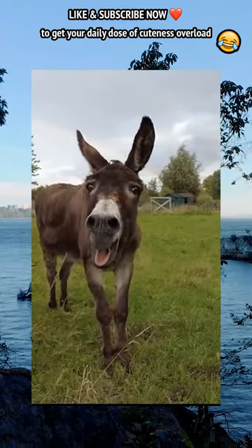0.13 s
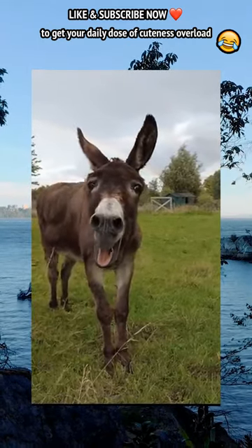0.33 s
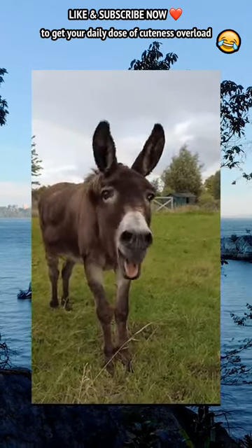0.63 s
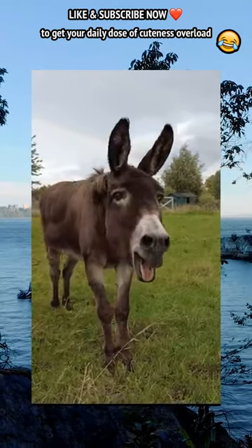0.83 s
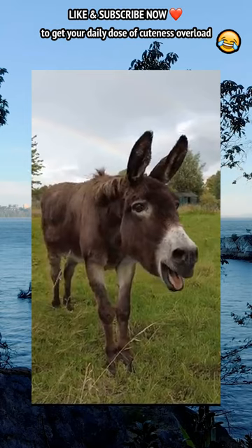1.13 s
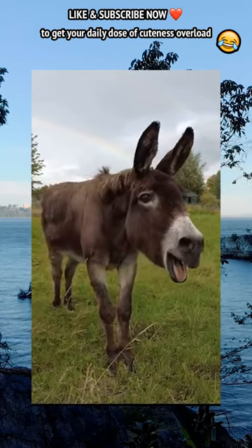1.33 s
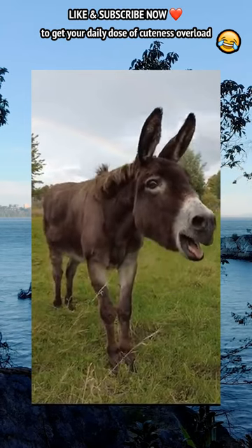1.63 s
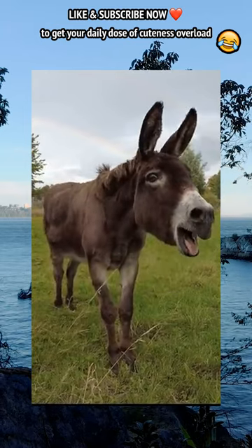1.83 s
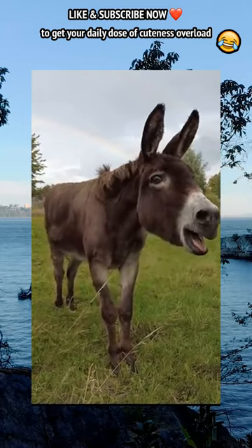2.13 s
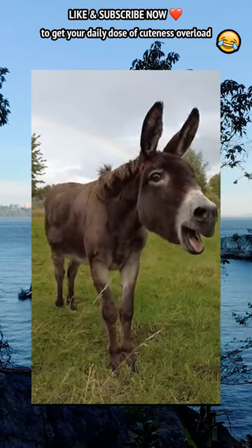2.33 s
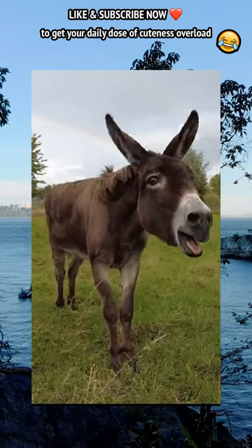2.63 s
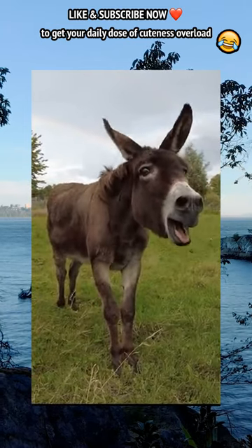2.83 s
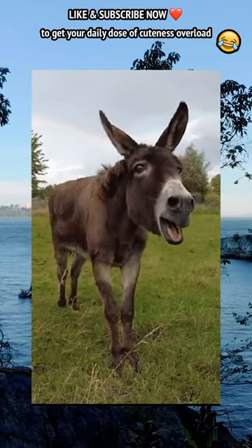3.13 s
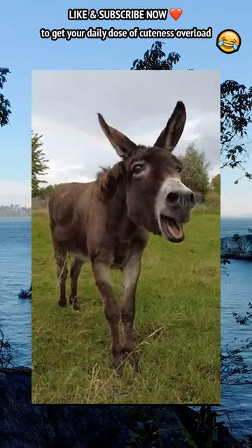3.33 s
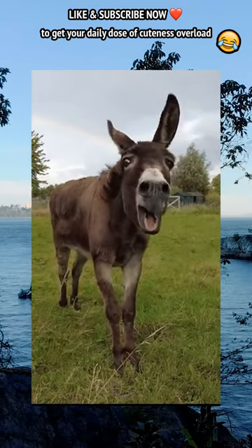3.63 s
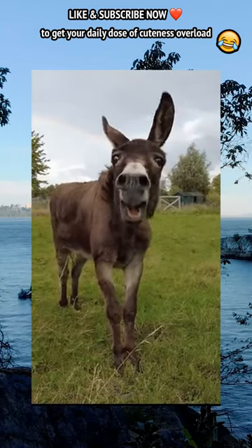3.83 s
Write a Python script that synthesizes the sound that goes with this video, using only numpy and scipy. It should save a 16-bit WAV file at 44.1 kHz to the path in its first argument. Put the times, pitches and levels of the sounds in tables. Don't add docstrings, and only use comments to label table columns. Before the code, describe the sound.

Donkey bray: rasping creaks, whistled in-breaths and puffs repeat about twice a second, ending in loud honks

```python
import sys
import numpy as np
from scipy import signal
from scipy.fft import rfft, irfft
from scipy.io import wavfile
from scipy.ndimage import uniform_filter1d, map_coordinates

SR = 44100
rng = np.random.default_rng(int(sys.argv[2]) if len(sys.argv) > 2 else 0)


def inscribe(sig):
    pcm = np.round(np.clip(np.atleast_2d(sig).T, -1, 1) * 32767)
    wavfile.write(sys.argv[1], SR, pcm.astype(np.int16))


def decibels_to_gain(level_db):
    exponent = np.asarray(level_db, float) / 20
    return 10 ** exponent


N = 176400
T = np.arange(N) / SR


def ring(x, modes, twice=False):
    out = 0
    for k, (hz, width_hz, db) in enumerate(modes):
        b, a = signal.iirpeak(hz, hz / width_hz, fs=SR)
        y = signal.lfilter(b, a, x)
        if twice:
            y = signal.lfilter(b, a, y)
        out = out + (-1) ** k * decibels_to_gain(db) * y
    return out


def highpass(x, order, hz):
    return signal.sosfilt(signal.butter(order, hz, "high", fs=SR, output="sos"), x)


def unit(x):
    return x / np.sqrt(np.mean(x ** 2))


def walk(rate_hz):
    k = max(int(SR / rate_hz), 1)
    return unit(uniform_filter1d(uniform_filter1d(rng.standard_normal(N), k), k))


def track(table, col):
    rows = np.array(table, float)
    return uniform_filter1d(np.interp(T, rows[:, 0], rows[:, col]), size=64)


def swell(start, end, edge):
    u = (T - start) / (end - start)
    return np.sin(np.pi / 2 * np.clip(np.minimum(u, 1 - u) / edge, 0, 1)) ** 2


def add_clicks(buf, s, db):
    at = np.clip(np.asarray(s) * SR, 0, N - 2)
    i = at.astype(int)
    np.add.at(buf, i, decibels_to_gain(db) * (1 - at + i))
    np.add.at(buf, i + 1, decibels_to_gain(db) * (at - i))


# t/s, level/dB
CLOSING_SLAPS = [(0.138, -32), (0.144, -26), (0.1475, -27.5), (0.1537, -28.5), (0.1606, -22), (0.1706, -17),
                 (0.1771, -17), (0.1857, -14), (0.1948, -14.5), (0.2087, -8.5), (0.2181, -11.5),
                 (0.2455, -14.5), (0.6365, -18), (0.6462, -28), (0.6554, -17), (0.6655, -20.5),
                 (0.678, -13), (0.6932, -11.5), (0.7203, -16.5), (1.1428, -33), (1.1491, -30.5),
                 (1.1547, -28.5), (1.162, -28.5), (1.1716, -22), (1.1836, -23), (1.1951, -14.5),
                 (1.2155, -18.5), (1.6874, -33.5), (1.6911, -32), (1.699, -26.5), (1.707, -25),
                 (1.7162, -22.5), (1.7313, -15), (1.757, -16.5), (2.2109, -31), (2.2176, -29),
                 (2.2229, -35), (2.232, -28), (2.2443, -20.5), (2.2659, -16), (2.7839, -30), (2.798, -34.5),
                 (2.8068, -25), (2.8228, -21.5), (3.3629, -25), (3.3746, -28.5), (3.3861, -24.5),
                 (3.9709, -28.5), (3.974, -34), (3.988, -30.5)]


def closing_creaks(throat, mouth, teeth):
    s, db = np.array(CLOSING_SLAPS).T
    bright_gap_s = 0.013
    dull = np.sqrt(np.clip(1 - np.diff(s, prepend=0) / bright_gap_s, 0, 1))
    db = db + 3.5
    add_clicks(teeth, s, db - 5 * dull)
    add_clicks(mouth, s, db + 3.5 * (2 * dull - 1))
    add_clicks(throat, s, db + 2 + 12 * (dull - 1))


# start t/s, length/s, second gap/s, settled gap/s, click level/dB
OPENING_CREAKS = [
    (0.3132, 0.11, 0.0065, 0.004, -6.5),
    (0.832, .088, 0.0072, 0.0042, -6.5),
    (1.368, 0.071, 0.0079, .0049, -10),
    (1.9063, 0.058, 0.0076, 0.0044, -8.5),
    (2.46, 0.048, 0.008, .0048, -15.5),
    (3.0246, 0.039, .008, 0.0054, -16),
    (3.5904, 0.044, 0.0073, 0.0039, -17),
]
# first gap/s, throat ring level/dB, time until it dulls/s
OPENING_GROANS = [
    (.0089, -14.5, 0.054),
    (.0095, -13.5, 0.023),
    (0.0128, -14.5, 0.015),
    (.0082, -14.5, 0.003),
    (.0086, -15.5, .002),
    (0.0102, -15, 0.0012),
    (.0128, -19, 0.0016),
]


def opening_creaks(throat, narrowed, mouth, teeth):
    settle, jitter, swell_s = 0.72, 0.03, 0.014
    dull_db_per_s, dullest_db = 502, -21.5
    for (start, length, second, settled, db), (first, groan_db, dulls) in zip(OPENING_CREAKS, OPENING_GROANS):
        k = np.arange(32)
        gap_chance, level_chance = rng.standard_normal((2, 32))
        gaps = (settled + (second - settled) * settle ** k) * (1 + jitter * gap_chance * (k / 8) ** 2.7)
        s = np.cumsum(np.append([0, first], gaps))[:len(k)]
        on = s < length
        u = np.clip(s / length, 0.01, 0.99)
        dull = np.clip(-dull_db_per_s * (s - dulls), dullest_db, 0)
        groan = groan_db - 9 * np.exp(-s / swell_s) + 1.17 * gap_chance - 6 * u ** 6
        at = start + s[on]
        add_clicks(teeth, at, (db + dull + 0.6 * level_chance)[on])
        add_clicks(mouth, at, (db - 2.5 + 0.7 * dull - 8 * u ** 3)[on])
        add_clicks(throat, at, (groan + 10 * np.log10(1 - u ** 2))[on])
        add_clicks(narrowed, at, (groan + 20 * np.log10(u))[on])


def spray(clicks):
    tail = signal.lfilter([1], [1, -np.exp(-1 / (0.003 * SR))], clicks)
    return clicks + tail * rng.standard_normal(N) * decibels_to_gain(-22)


# f/Hz, width/Hz, level/dB
THROAT = [(389, 26.8, 5.5), (906, 97, 5.5)]
# f/Hz, width/Hz, level/dB
NARROWED_THROAT = [(363.6, 24, 3.5), (821, 31, 7)]
# f/Hz, width/Hz, level/dB
MOUTH = [(1373, 52, 4.5), (1850, 420, 1.5), (2510, 100, 0)]
# f/Hz, width/Hz, level/dB
TEETH = [(3080, 140, -1), (4225, 143, 4), (4664, 1100, -7.5), (5800, 160, -1), (6240, 400, -10.5),
         (7790, 1100, -14), (8900, 530, -15), (12800, 3500, -27)]


def creaks():
    throat, narrowed, mouth, teeth = np.zeros((4, N))
    closing_creaks(throat, mouth, teeth)
    opening_creaks(throat, narrowed, mouth, teeth)
    mouth, teeth = signal.lfilter(*signal.butter(2, 7500, fs=SR), [mouth, teeth])
    groan = decibels_to_gain(28.5) * ring(throat, THROAT) + decibels_to_gain(34.5) * ring(narrowed, NARROWED_THROAT)
    crack = decibels_to_gain(-5) * ring(teeth, [(4900, 5100, 0.03)], True) + decibels_to_gain(9.5) * ring(mouth, [(1410, 1600, 0.03)])
    return groan + crack + decibels_to_gain(20) * ring(spray(mouth), MOUTH) - decibels_to_gain(19.5) * ring(spray(teeth), TEETH)


# start t/s, end t/s, level/dB, f/Hz, roughness (0-1)
HEE_NOTES = [(0.248, 0.311, -26, 5770, 0.53), (0.28, 0.312, -31.5, 6190, 0.6),
             (0.737, 0.797, -22, 5800, 0.9), (0.768, 0.802, -21.5, 6080, 0.6),
             (1.243, 1.357, -29.5, 5900, 0.9), (1.263, 1.326, -16.5, 6220, 0.2),
             (1.305, 1.335, -17, 5530, 0.11), (1.782, 1.856, -18.5, 5910, 0.6),
             (1.825, 1.872, -12, 5530, 0.2), (2.31, 2.377, -14.5, 5786, 0.31), (2.329, 2.365, -25, 6170, 0),
             (2.345, 2.434, -10, 5496, 0.05), (2.873, 2.999, -10.5, 5478, .06),
             (3.447, 3.575, -9, 5452, 0.19), (2.346, 2.366, -24, 3030, 0.42),
             (0.256, .312, -40.5, 4130, .8), (0.731, 0.813, -35.5, 4220, .9),
             (1.268, 1.33, -32.5, 9430, .7), (0.778, .81, -41.5, 12800, .9), (0.747, 0.757, -34, 8900, .9),
             (2.385, 2.407, -38, 8100, .6)]
# f/Hz, width/Hz, level/dB
NOSE = [(2570, 220, 2.5), (3024, 224, 7.5), (4500, 1130, -2.5), (5190, 198.5, 11.5), (5440, 400, 3.5),
        (6045, 190, 3.5), (7880, 800, -2), (9560, 370, -4.5), (10770, 790, -7.5), (13300, 780, -14.5),
        (14640, 1300, -14), (1530, 2560, -9)]


def whistles():
    sag_hz_per_s, air_lead_s = 1100, 0.023
    tone, draw = 0, 0
    for start, end, db, hz, rough in HEE_NOTES:
        sagging_hz = hz - sag_hz_per_s * np.clip(T - start, 0, 0.2)
        pitch = sagging_hz * (1 + 0.036 * rough * walk(580))
        level = decibels_to_gain(db + 5.26 * rough * walk(190)) * swell(start, end, 0.32)
        tone = tone + level * np.sin(2 * np.pi * np.cumsum(pitch) / SR)
        air_level = decibels_to_gain(-28.5 + 0.42 * (db + 14.5))
        draw = np.maximum(draw, swell(start - air_lead_s, end + air_lead_s, 0.5) * air_level)
    noise = rng.standard_normal(N)
    air = 0
    for k, mode in enumerate(NOSE):
        air = air + (-1) ** k * decibels_to_gain(4.25 * walk(60)) * ring(noise, [mode], True)
    octave = highpass(2 * tone ** 2, 4, 7000)
    return np.sqrt(2) * tone + decibels_to_gain(-2.5) * octave + draw * unit(air)


# peak t/s, level/dB, rise/s and fall/s through 20 dB, overtone level/dB
HAWS = [
    (2.665, -28, 0.069, 0.063, -26.5),
    (3.208, -16, .048, 0.077, -3),
    (3.787, -14, .068, 0.089, 5.5),
]
# start t/s, end t/s, level/dB, f/Hz
HONKS = [
    (2.608, 2.664, -13, 806),
    (3.148, 3.223, -11, 800),
    (3.708, 3.772, -8, 775),
]


def effort():
    veiled_db, closes_s = -19.5, 0.059
    haw_level, honk_level, overtones, honk_hz = 0, 0, 0, 0
    for (peak, db, rise, fall, over_db), (start, end, honk_db, hz) in zip(HAWS, HONKS):
        u = (T - peak) / np.where(T < peak, rise, fall)
        s = np.maximum(T - start, 0)
        near = abs(u) < 2
        haw_level = haw_level + decibels_to_gain(db - 20 * abs(u) ** np.where(T < peak, 2.0, 2.6))
        honk_level = honk_level + decibels_to_gain(honk_db) * swell(start, end, 0.31)
        freed_db = np.where(T < end, veiled_db, -6 * ((T - end) / closes_s) ** 3)
        overtones = overtones + near * decibels_to_gain(over_db + freed_db)
        scoop = 0.15 * np.exp(-s / 0.009)
        climb = 0.11 * np.minimum(s / (end - start), 1) ** 3
        honk_hz = honk_hz + near * hz * (1 + scoop + climb)
    return haw_level, honk_level, overtones, honk_hz


# multiple of the pitch, level/dB
HAW_HARMONICS = [(1, 0), (2, -16.5), (3, -11), (4, -34.5), (5, -23), (6, -19.5), (7, -21), (8, -31)]


def voice():
    haw_level, honk_level, overtones, honk_hz = effort()
    rest_hz, pull_hz = 363.5, 42.28
    haw_hz = rest_hz - pull_hz * haw_level ** 2 / (haw_level ** 2 + decibels_to_gain(-24) ** 2)
    haw_phase = 2 * np.pi * np.cumsum(haw_hz * (1 + 0.005 * walk(120))) / SR
    honk_phase = 2 * np.pi * np.cumsum(honk_hz * (1 + 0.014 * walk(160))) / SR
    haw, honk = 0, 0
    for k, (_, db) in enumerate(HAW_HARMONICS):
        haw = haw + decibels_to_gain(db) * (overtones if k else 1) * np.cos((k + 1) * haw_phase - 0.29 * k)
    for k, db in enumerate((-3.5, -18, -28.5)):
        honk = honk + decibels_to_gain(db) * np.sin((k + 1) * honk_phase)
    sum_tone = decibels_to_gain(9) * np.sin(haw_phase + honk_phase)
    side_tones = decibels_to_gain(-5) * (np.sin(honk_phase - haw_phase) + np.sin(honk_phase + 2 * haw_phase))
    both = haw_level * honk_level * (sum_tone + side_tones)
    hoarse = unit(ring(rng.standard_normal(N), PUFF_MODES + THROAT))
    rasp = decibels_to_gain(-25) * (haw_level + honk_level) * (1 + np.sin(haw_phase)) * hoarse
    return np.sqrt(2) * (haw_level * haw + honk_level * honk + both) + rasp


# start t/s, length/s, level/dB, chest hum level/dB
PUFFS = [
    (-.05, 0.13, -41.5, -25),
    (0.475, 0.097, -42, -8),
    (0.966, 0.1, -40, -19),
    (1.482, 0.16, -38, -5),
    (2.01, 0.14, -37, -1.5),
    (2.547, 0.18, -35, -40),
    (3.098, 0.2, -31.5, -28),
    (3.659, 0.24, -28.5, -28),
]
# f/Hz, width/Hz, level/dB
PUFF_MODES = [(1005, 440, 3.5), (1390, 400, 5), (1720, 650, -1), (2390, 650, -15), (433, 67, -1.5),
              (3980, 900, -20), (5250, 330, -13.5), (8400, 16000, -31)]


def breath():
    air, hum = np.zeros((2, N))
    for start, length, db, hum_db in PUFFS:
        u = np.clip((T - start) / length, 0, 1)
        air += decibels_to_gain(db) * np.sin(np.pi * u ** 0.91) ** 1.04
        hum += decibels_to_gain(db + hum_db) * np.sin(np.pi * u ** 1.7) ** 2
    air_noise, chest_noise = rng.standard_normal((2, N))
    puff = air * decibels_to_gain(2.4 * walk(70)) * unit(ring(air_noise, PUFF_MODES, True))
    return puff + hum * unit(ring(chest_noise, [(352.1, 17, 0)], True))


# t/s, peak level/dB, f/Hz
SMACKS = [(0.045, -58, 2840), (0.105, -66, 1880), (0.423, -40, 3550), (.612, -70, 2450), (.912, -42, 3580),
          (1.435, -46, 3720), (1.6272, -43, 1850), (1.65, -63, 3000), (2.147, -44, 1960),
          (2.7233, -50.5, 2250), (3.2966, -43, 1830), (3.904, -38, 1800)]


def smacks():
    out = np.zeros(N)
    for s, db, hz in SMACKS:
        u = np.clip(T - s, 0, 0.03)
        shape = u / 0.0011 * np.exp(1 - u / 0.0026) * (T - s < 0.03)
        glide = np.sin(2 * np.pi * hz * u * (0.93 + 6 * u))
        out += decibels_to_gain(db) * shape * (glide + 0.5 * np.sin(2 * np.pi * 1.3 * hz * u))
    return out


# t/s, left over right level of the treble/dB
HEAD_AIM = [
    (0.0, -1.5),
    (1.3, -2.2),
    (2.2, -2.5),
    (2.8, -4),
    (4.0, -3),
]


def near_field(donkey):
    lag_s = 1.4e-5
    treble = highpass(donkey, 1, 1500)
    pan_db = track(HEAD_AIM, col=1) / 2
    late = [map_coordinates(treble, [(T - d) * SR], mode="nearest") for d in (lag_s / 2, -lag_s / 2)]
    panned = np.array(late) * decibels_to_gain(np.array([pan_db, -pan_db]))
    width = decibels_to_gain(8.0) * np.gradient(ring(donkey, [(710, 270, 0.0019)])) * np.array([[1], [-1]])
    return donkey - treble + width + panned


def echo(donkey):
    tail = rng.standard_normal((2, SR // 2)) * decibels_to_gain(-60 * T[:SR // 2] / 0.7)
    tail *= decibels_to_gain(-36) / np.sqrt(np.sum(tail ** 2) / 2)
    return signal.fftconvolve(donkey[None], tail, axes=1)[:, :N]


# t/s, rumble level/dB, flutter level/dB
WIND = [
    (0.0, -53, -43),
    (1.87, -41.5, -47),
    (4.0, -50, -65.5),
]
# f/Hz, level/dB
AIR_COLOUR = [(12, -47), (20, 1), (160, -16), (638, -18.5), (1140, -28.5), (4950, -41), (5380, -48.5),
              (5850, -43), (15000, -47)]


def field():
    hz = np.fft.rfftfreq(N, 1 / SR) + 1
    colour_hz, colour_db = np.array(AIR_COLOUR).T
    colour = decibels_to_gain(np.interp(np.log(hz), np.log(colour_hz), colour_db))
    mid, side = irfft(rfft(rng.standard_normal((2, N))) * colour, N)
    wide = decibels_to_gain(-6) * signal.lfilter(*signal.butter(2, 90, "high", fs=SR), side) * np.array([[1], [-1]])
    sway = decibels_to_gain(1.5 * walk(2.5) - 0.8 * T)
    hiss = decibels_to_gain(-46) * sway * (mid + wide) / np.std(mid)
    low_band = signal.butter(2, [18, 59], "band", fs=SR, output="sos")
    rumble = unit(signal.sosfilt(low_band, rng.standard_normal(N))) * decibels_to_gain(track(WIND, col=1) + 2 * walk(8))
    flutter = unit(ring(rng.standard_normal(N), [(107.5, 67, 0)], True)) * decibels_to_gain(track(WIND, col=2))
    return hiss + rumble + flutter


def scene():
    donkey = creaks() + whistles() + voice() + breath() + smacks()
    return near_field(donkey) + echo(donkey) + field()


def low_pass(x):
    return signal.sosfilt(signal.butter(12, 16000, fs=SR, output="sos"), x)


def record(dry):
    return low_pass(dry)


dry = scene()
out = record(dry)
inscribe(out)
```